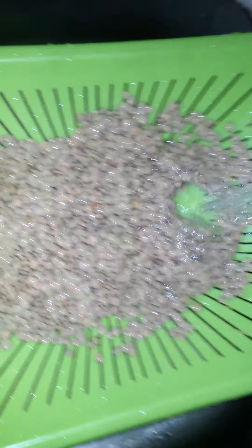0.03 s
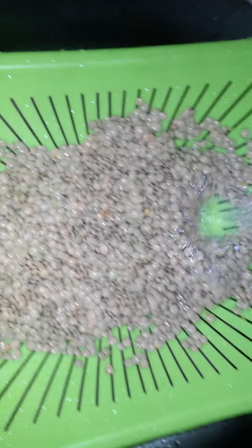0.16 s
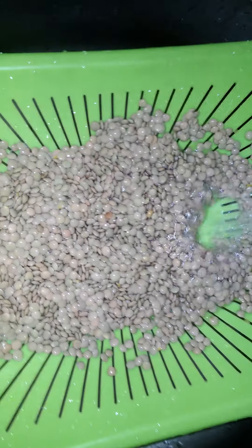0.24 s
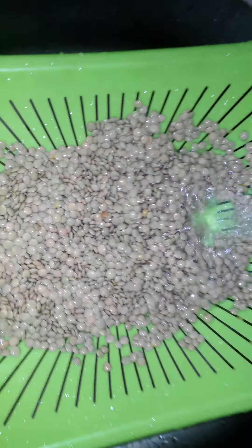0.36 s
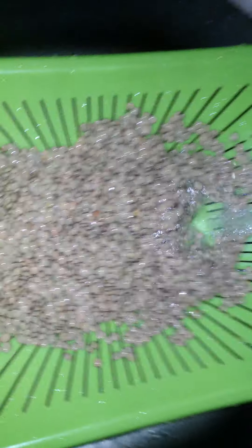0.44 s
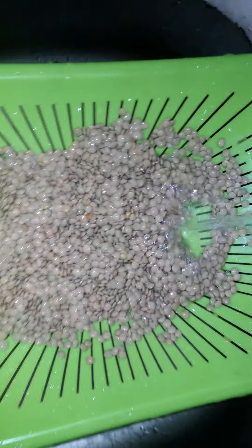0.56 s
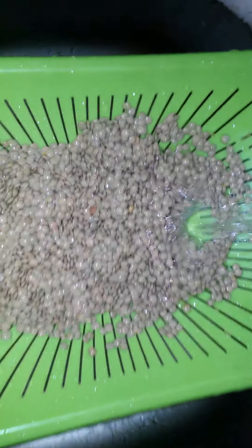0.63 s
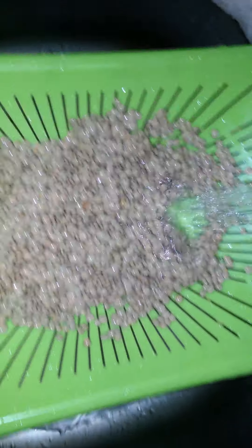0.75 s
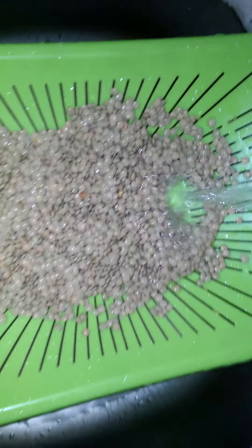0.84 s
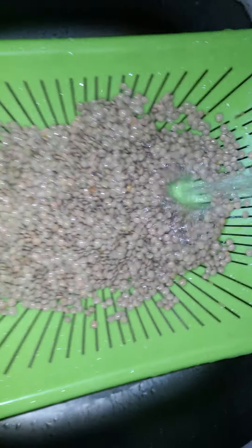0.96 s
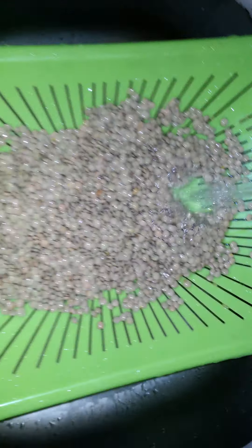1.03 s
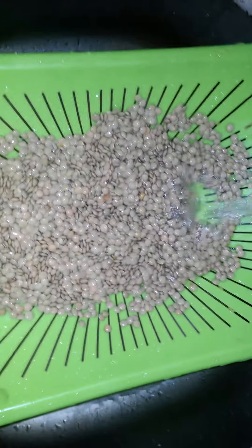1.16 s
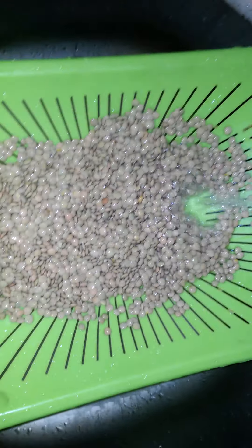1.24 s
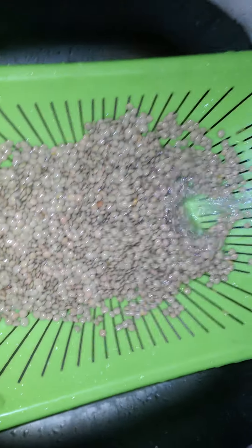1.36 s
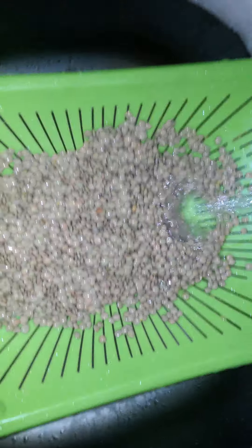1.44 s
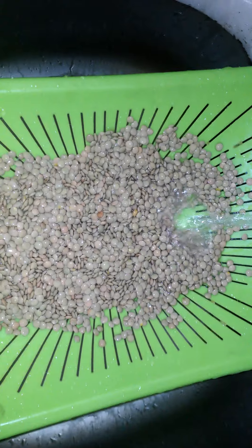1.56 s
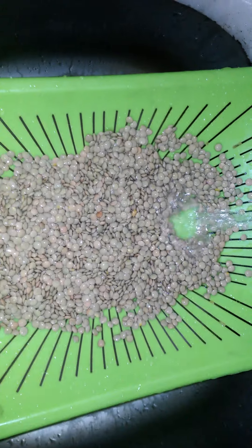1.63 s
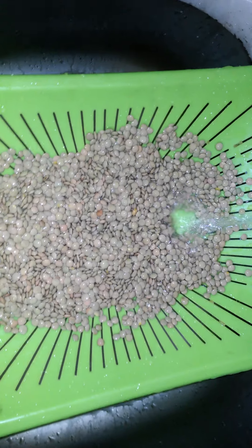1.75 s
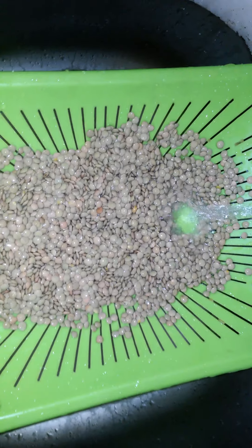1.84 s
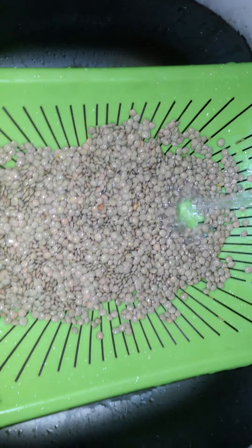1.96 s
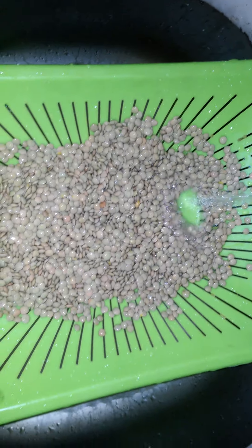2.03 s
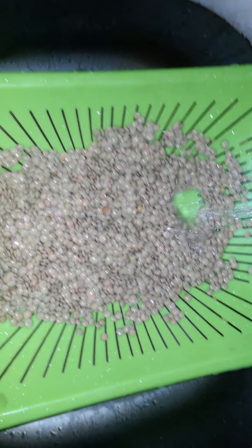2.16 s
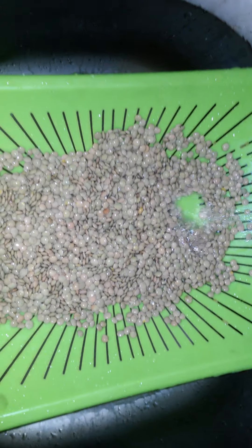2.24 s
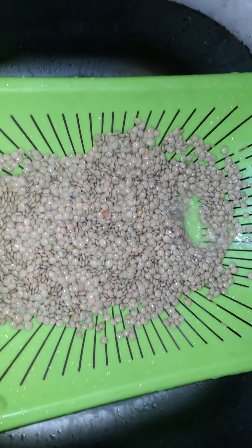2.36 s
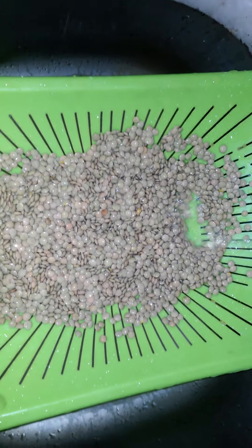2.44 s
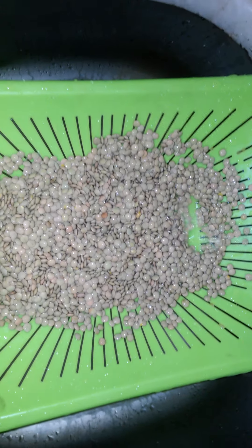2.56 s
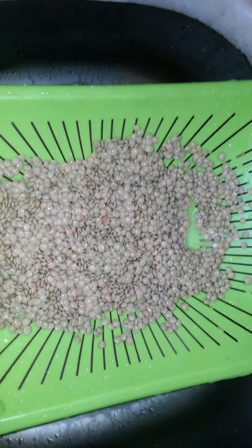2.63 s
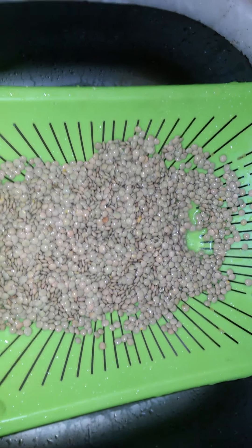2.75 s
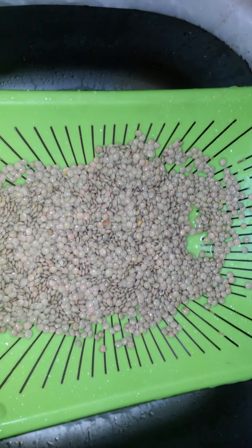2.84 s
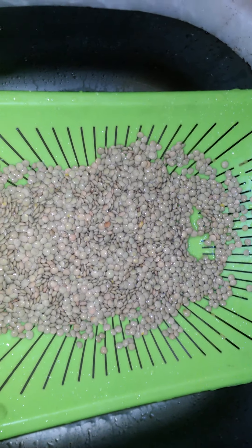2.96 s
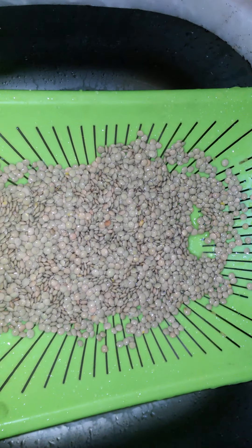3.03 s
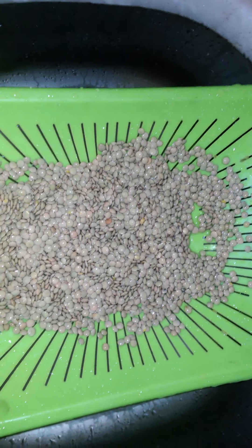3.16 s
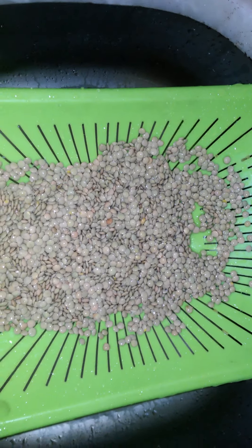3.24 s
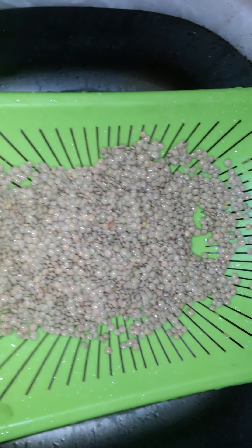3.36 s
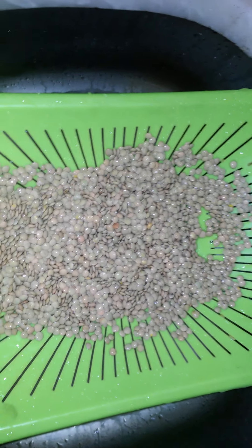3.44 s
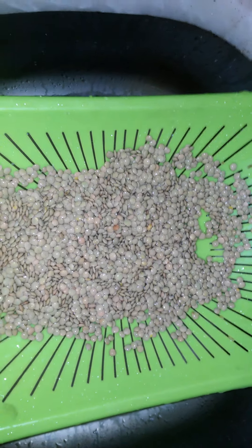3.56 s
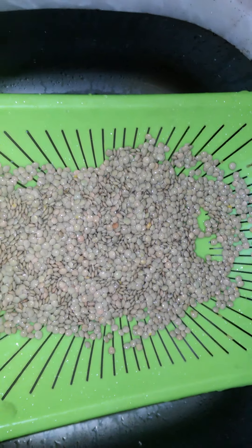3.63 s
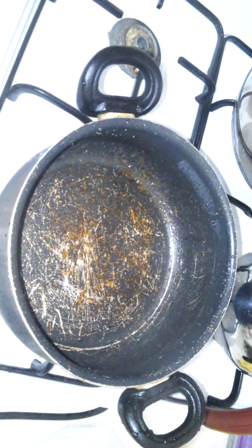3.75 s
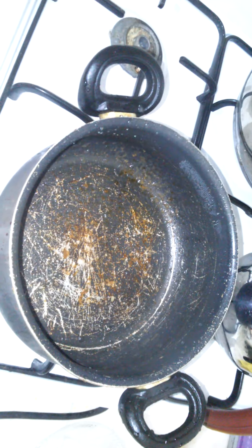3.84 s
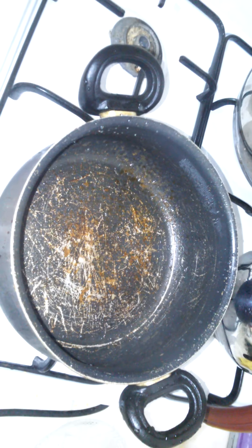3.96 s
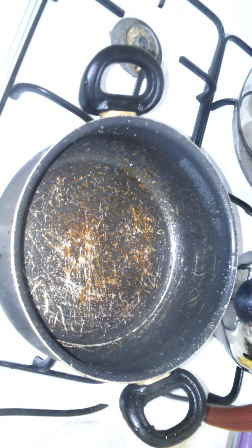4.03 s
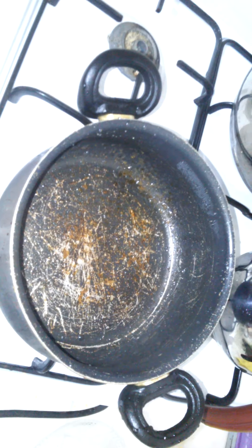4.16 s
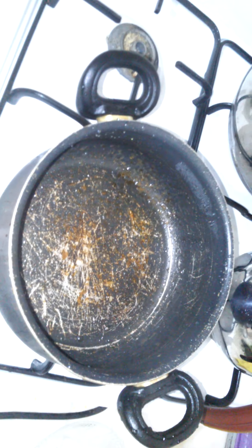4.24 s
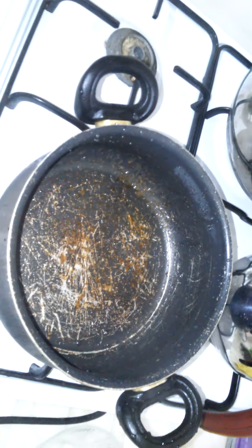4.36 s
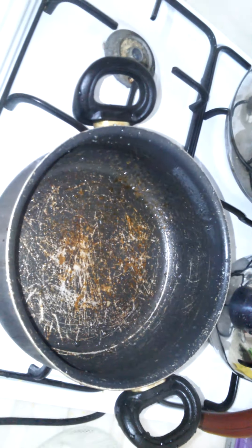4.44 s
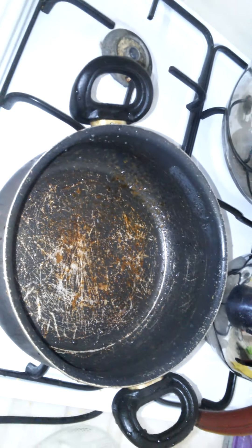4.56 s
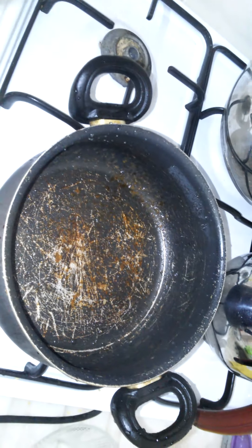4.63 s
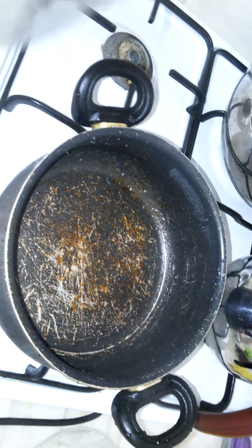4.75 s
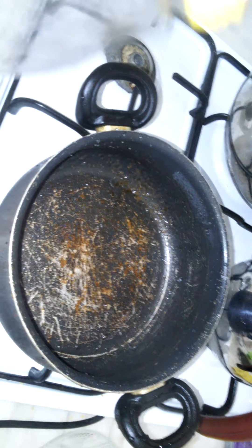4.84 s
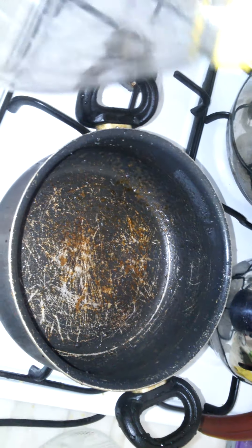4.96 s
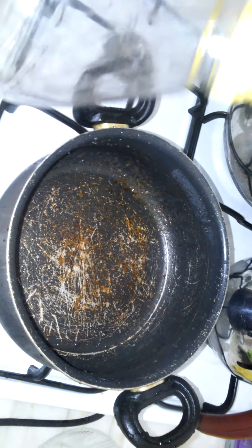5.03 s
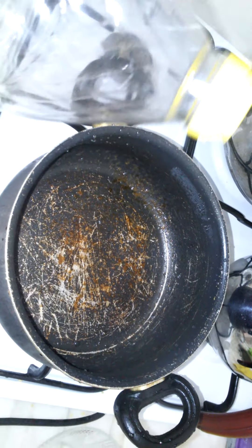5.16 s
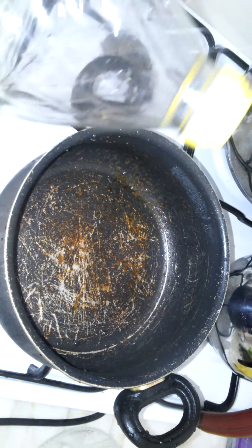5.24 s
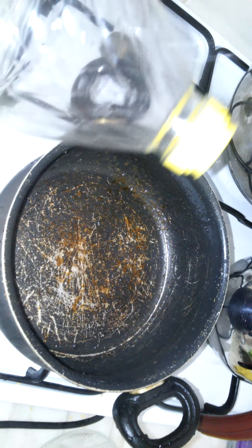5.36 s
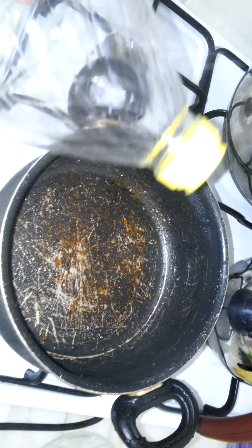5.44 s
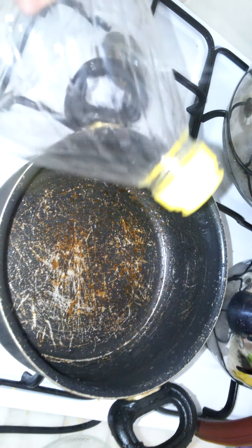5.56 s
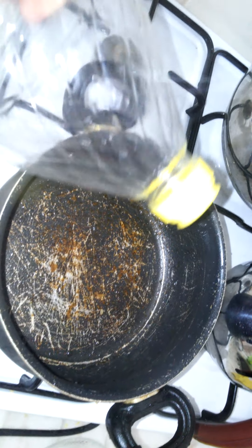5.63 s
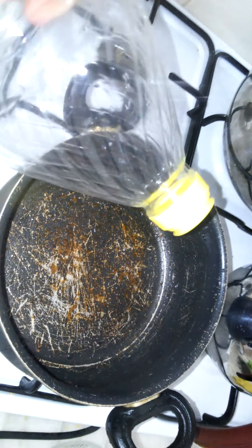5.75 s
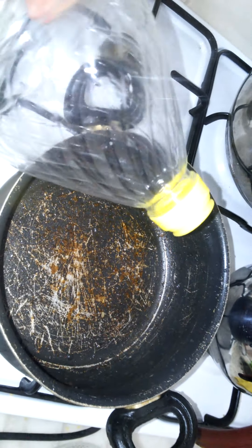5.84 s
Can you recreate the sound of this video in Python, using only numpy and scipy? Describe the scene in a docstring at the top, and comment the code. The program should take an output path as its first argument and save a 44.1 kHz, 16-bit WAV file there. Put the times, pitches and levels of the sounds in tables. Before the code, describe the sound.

Close up in a small hard kitchen, a tap sprays with bright crackle onto lentils in a plastic colander, with slapping drops, gurgling bubbles and soft drumming on the sink. The flow is turned down and stops, leaving plops and drips over a low hum. At a hard cut everything drops to almost silent room noise with a faint whirr and thin hiss.

```python
"""A crackling spray comes first: a tap runs onto lentils in a plastic colander, and each droplet is a tiny noise burst.
Drops slap with bright noise, air pockets plop and gurgle as ringing tones that rise, and run-off drums on the sink.
The flow dies away over a low hum, in a small hard kitchen made of short noise echoes.
Then the scene cuts to a quiet stove: only faint room noise, a whirr that comes and goes and a high hiss."""
import sys
import numpy as np
from scipy import signal
from scipy.fft import rfft, irfft, next_fast_len
from scipy.io import wavfile
from scipy.ndimage import map_coordinates

SR = 44100
rng = np.random.default_rng(int(sys.argv[2]) if len(sys.argv) > 2 else 0)


def inscribe(sig):
    """Save sig as 16-bit PCM at rate SR to the path in sys.argv[1].

    A 1-D sig is mono; a 2-D sig holds one channel per row.
    Samples are clipped to [-1, 1] before scaling.
    """
    pcm = np.round(np.clip(np.atleast_2d(sig).T, -1, 1) * 32767)
    wavfile.write(sys.argv[1], SR, pcm.astype(np.int16))


N = 260179
CUT_S = 3.642  # the sink is heard up to here

# Tone colour of the droplets bursting on the lentils: pitch_hz, gain_db
SPRAY_COLOUR = [(500, -19), (900, -11.5), (2500, 1), (5000, -3), (8000, 3), (11000, 1), (16000, 1)]


def spray(level_db, rate=600, scatter_db=9.0, life_s=.0025, mist_db=-15, crack_db=-8.0, crack_follow=0.88,
          fizz_db=-10, fizz_follow=1.5, clump_db=2.2):
    """Droplets burst as tiny cracks of very unequal size; a strong jet also beats up pinhead bubbles."""
    full_db = level_db.max()
    drop_db = level_db - full_db
    at, density = arrivals(level_db, rate, thinning=.5)
    sizes = amp(scatter_db * np.minimum(rng.standard_normal(N)[at], 2))
    # each burst adds energy that dies away; dividing by the density keeps the average even
    energy = np.bincount(at, sizes ** 2 / np.mean(sizes ** 2), N) * SR / density
    keep = np.exp(-2 / (life_s * SR))
    energy = signal.lfilter([1 - keep], [1, -keep], energy)
    loudness = np.sqrt(energy + amp(mist_db) ** 2)
    cracks = coloured(loudness * rng.standard_normal(N), SPRAY_COLOUR)
    cracks *= amp(full_db + crack_db + crack_follow * drop_db)  # the crackle outlasts the fizz
    fizz = swarm(full_db + fizz_db + fizz_follow * drop_db, rate=2000, thinning=0.29, centre_hz=7570,
                 spread=.3, deepening=0, cycles=13, rise=0.072, scatter_db=6.0, size=500)
    clumps = amp(clump_db * wobble(45))  # the jet breaks up in clumps
    return (cracks + fizz) * clumps


# Big drops that slap the wet plastic: start_s, level_db (before the gains below), pitch_hz (centre of the noise)
SPLATS = [(0.0715, -2.5, 8040), (0.2179, -5.5, 6540), (0.4712, -3, 8360), (1.1532, -4, 7160),
          (1.3971, -4.5, 8300), (1.4236, -2, 8700), (1.517, -12, 9150), (1.5617, -6.5, 7500),
          (1.662, -8.5, 8200), (1.7548, -5, 7200), (1.9539, -18, 7000), (2.0122, -3.5, 6400),
          (2.1093, -9.5, 8700), (2.2966, -12, 9450), (2.3464, -19, 7920), (2.4944, -19.5, 6200),
          (2.589, -14, 10200), (2.7181, -16.5, 6270), (3.0623, -8.5, 8040), (3.1142, -0.5, 6660),
          (3.1504, -12.5, 7300), (3.2934, -13, 11600), (3.5652, -14, 6760)]


def jet_gaps(gap_s=.028, gap_db=-4.5):
    """Gain of the spray: the jet necks in just before each big drop lands."""
    t = np.arange(N) / SR
    necks = sum(np.sin(np.pi * np.clip((s - t) / gap_s, 0, 1) ** .5) for s, _, _ in SPLATS)
    return amp(gap_db * necks)


def splats(life_s=0.006, width_hz=1900, gain_db=-13.5, crack_db=-20.0, crack_follow=0.36, crack_s=.004):
    """A drop slaps down: a bright crack, much alike for all drops, and brief fizzing noise around one pitch."""
    out = np.zeros(N)
    t = np.arange(SR // 16) / SR
    attack = np.minimum(t / .0008, 1) ** 2
    for s, db, hz in SPLATS:
        fizz = amp(db + gain_db) * band(hz, width_hz, size=len(t)) * np.exp(-t / life_s)
        crack = amp(crack_db + crack_follow * db) * band(9000, 12000, size=len(t)) * np.exp(-t / crack_s)
        add(out, s, (fizz + crack) * attack)
    return out


# Air pockets that ring out: start_s, level_db (before the gain below), pitch_hz
PLOPS = [(0.023, -11.5, 1716), (0.071, -4.5, 4370), (0.177, -9, 2840), (0.553, -10.5, 2000),
         (0.737, -9.5, 2470), (0.949, -6, 2087), (0.993, -9.5, 2017), (1.07, -10, 3060), (1.257, -10, 3350),
         (1.334, -7, 5730), (1.44, -9.5, 2880), (1.541, -9, 3580), (1.909, -14.5, 3020),
         (2.039, -11.5, 2085), (2.169, -12, 3100), (2.285, -22, 1587), (2.454, -16.5, 3110),
         (2.55, -20.5, 4270), (2.64, -11.5, 4790), (2.788, -23, 1112), (2.807, -22, 2130),
         (2.823, -20.5, 1123), (3.052, -23.5, 1503), (3.152, -27.5, 1194), (3.224, -26, 1665),
         (3.292, -25, 1120), (3.373, -16, 2960), (3.447, -19, 6200), (3.467, -14.5, 2920),
         (3.468, -22, 1387), (3.54, -20, 1677), (3.56, -19, 1784)]


def plops(rows, gain_db=7.5, splash_db=-24, splash_s=0.014, splash_width=0.65):
    """A larger air pocket rings as it tears loose, with a splash of noise near its own pitch."""
    out = np.zeros(N)
    t = np.arange(SR // 12) / SR
    for s, db, hz in rows:
        note = bubble(t, hz, cycles=7.44, rise=.18, onset=.65)
        splash = band(hz, splash_width * hz, size=len(t)) * np.exp(-t / splash_s)
        add(out, s, amp(db + gain_db) * (note + amp(splash_db) * splash))
    return out


def lesser_plops(level_db, count=22, above_db=9, scatter_db=1.5, low_hz=1500, high_hz=3500):
    """More air pockets in the same columns, at random moments, their strength following the gurgle."""
    moment, pitch = rng.random((count, 2)).T
    s = (np.arange(count) + moment) / count * CUT_S  # one in each equal slice of time
    db = level_db[(s * SR).astype(int)] + above_db + scatter_db * rng.standard_normal(count)
    hz = low_hz * (high_hz / low_hz) ** pitch
    return list(zip(s, db, hz))


# Tone colour of the bubbles between the lentils: pitch_hz, gain_db
GURGLE_COLOUR = [(300, -3), (580, -22), (820, -5), (1020, -10.5), (1130, 3), (1330, -19), (1550, -2.5),
                 (2050, -1.5), (2320, -5), (2600, 1), (4200, 0), (7000, -8)]


def gurgle(level_db, gain_db=-1):
    """Water folds air into the gaps between the lentils, as a crowd of small ringing bubbles."""
    bubbles = swarm(level_db + gain_db, rate=700, thinning=.8, centre_hz=2415, spread=.5, deepening=.028,
                    cycles=6.5, rise=0.17, scatter_db=4.0, size=1200)
    return coloured(bubbles, GURGLE_COLOUR)


# Tones the sink rings at when struck: pitch_hz, width_hz, level_db (against each other)
SINK_TONES = [(214.3, 6.2, 7.5), (258, 30, -9.5), (315.2, 16, -2.5), (333, 15, -20.5), (460, 17, -30)]
# Gushes of run-off that thump the sink: start_s, level_db (before the gain below), pitch_hz
THUMPS = [(0.238, -14, 312.7), (0.734, -23, 222), (0.986, -28, 234), (1.184, -18.5, 324.5),
          (1.236, -24, 238.5), (2.822, -25, 213)]


def drumming(level_db, rate=170, gain_db=2, thump_db=1):
    """Run-off patters on the sink floor and makes its tones ring; gushes add thumps."""
    at, density = arrivals(level_db, rate, thinning=.2)
    blows = np.bincount(at, rng.standard_normal(N)[at], N) / np.sqrt(density)
    ring = filtered(blows, lambda f: sum(amp(db) * resonance(f, hz, width) for hz, width, db in SINK_TONES))
    ring = signal.sosfilt(signal.butter(2, [190, 520], "bandpass", fs=SR, output="sos"), ring)
    out = ring / np.std(ring[:round(CUT_S * SR)]) * amp(level_db + gain_db)
    t = np.arange(SR // 4) / SR
    for s, db, hz in THUMPS:
        add(out, s, amp(db + thump_db) * bubble(t, hz, cycles=5.7, rise=0.029, onset=0.23))
    return out


# The tap runs full, is turned off steadily, and then the lentils drain
CLOSING_S, SHUT_S, DRAIN_DB_PER_S = 1.2, 2.5, 4
# How each water sound follows the tap: full_db, loss_db (in closing), power (no unit; higher holds on longer)
SPRAY_FLOW = (-18, 17, 3.1)
GURGLE_FLOW = (-24.5, 13.5, .9)
RUNOFF_FLOW = (-40.5, 7, 14)


def flow(full_db, loss_db, power):
    """Level of a water sound in dB: it holds, falls as the tap closes, then ebbs as the lentils drain."""
    t = np.arange(N) / SR
    closed = np.clip((t - CLOSING_S) / (SHUT_S - CLOSING_S), 0, 1)
    return full_db - loss_db * closed ** power - DRAIN_DB_PER_S * np.maximum(t - SHUT_S, 0)


def runoff(surge_s=2.34, surge_width_s=.12, surge_db=4.5):
    """Level of the run-off in dB; the thinning jet pours straight through onto the sink for a moment."""
    t = np.arange(N) / SR
    return flow(*RUNOFF_FLOW) + surge_db * np.exp(-((t - surge_s) / surge_width_s) ** 2)


# How long the kitchen's echo takes to fall by 60 dB: pitch_hz, decay_s
KITCHEN_DECAY = [(200, 0.45), (1500, 0.27), (4000, 0.29), (8000, 0.29), (16000, 0.24)]


def kitchen(x, wet_db, order=4096):
    """Sink walls and tiles answer with fading noise; the answer changes as the water lands in new places."""
    out = np.zeros(N)
    for start in range(0, round(CUT_S * SR), order):  # a fresh echo for each short block
        hz, t, z = signal.stft(rng.standard_normal(SR // 2), SR, nperseg=256)
        fading = amp(-60 * t / along(KITCHEN_DECAY, hz)[:, None])
        tail = signal.istft(z * fading, SR, nperseg=256)[1]
        tail *= 1 - np.exp(-np.arange(len(tail)) / SR / 0.00037)  # soft start
        add(out, start / SR, signal.fftconvolve(x[start:start + order], tail / np.linalg.norm(tail)))
    return x + amp(wet_db) * out


# Low tones in the room: pitch_hz, width_hz (doubled below), level_db
HUM_TONES = [(63, 5, -50.5), (97.4, 3, -50), (114, 21, -50), (137.5, 2.7, -50)]


def hum(rumble_db=-64):
    """A few narrow bands of noise, heard as wavering low tones, over a faint rumble."""
    tones = sum(amp(db) * band(hz, 2 * width) for hz, width, db in HUM_TONES)
    return tones + amp(rumble_db) * band(35, 60)


# Tone colour of the quiet room: pitch_hz, gain_db
QUIET_COLOUR = [(20, 12.5), (65, 13), (92, 3), (114, 16.5), (150, 0), (250, 0), (310, 7), (400, 3.5),
                (540, -0.5), (1000, -0.5), (5000, -5), (16000, -7.5)]
# Spells of a faint whirr at the stove: start_s, length_s, level_db
WHIRR = [(4.078, 1.14, -82.5), (5.536, 0.5, -81.5)]


def quiet(level_db=-77, fade_s=0.046, hiss_db=-90.0, drift_db=2.5):
    """Faint room noise, a whirr that comes and goes and a high hiss that drifts, all of filtered noise."""
    t = np.arange(N) / SR
    air = amp(level_db) * unit(coloured(rng.standard_normal(N), QUIET_COLOUR))
    spells = sum(amp(db) * np.clip(np.minimum(t - s, s + length - t) / fade_s, 0, 1) for s, length, db in WHIRR)
    whirr = spells * band(428, 41.2)
    hiss = amp(hiss_db + drift_db * wobble(7)) * band(9200, 3500)
    return air + whirr + hiss


def swarm(level_db, rate, thinning, centre_hz, spread, deepening, cycles, rise, scatter_db, size):
    """Many short-lived bubbles of random pitch; fewer as the flow falls, and deeper if deepening is above 0."""
    at, density = arrivals(level_db, rate, thinning)
    pitch, strength, life = np.clip(rng.standard_normal((len(at), 3)), -2, 2).T[:, :, None]
    hz = centre_hz * np.exp(spread * pitch + deepening * (level_db[at, None] - level_db.max()))
    rings = bubble(np.arange(size) / SR, hz, cycles * np.exp(.35 * life), rise, onset=0.16)
    rings *= amp(scatter_db * strength)
    rings /= np.sqrt(np.mean(np.sum(rings ** 2, axis=1)))
    samples = at[:, None] + np.arange(size)
    sound = np.bincount(samples.ravel(), rings.ravel(), N)
    return sound * np.sqrt(SR / density) * amp(level_db)


def bubble(t, hz, cycles, rise, onset):
    """A ringing air pocket: it swells for a share of its life, and its pitch climbs as it nears the surface."""
    age = t * hz / cycles
    climbing_hz = hz * np.exp(rise * (np.tanh(age) - np.tanh(1)))
    phase = 2 * np.pi * np.cumsum(climbing_hz, axis=-1) / SR
    return np.sin(phase) * np.exp(-age) * (1 - np.exp(-(age / onset) ** 2))


def arrivals(level_db, rate, thinning):
    """Random sample positions: rate a second at full flow, sparser as the level falls. Also the local rate."""
    density = rate * amp(thinning * (level_db - level_db.max()))
    count = np.cumsum(density) / SR
    marks = np.cumsum(rng.exponential(size=20000))
    return np.searchsorted(count, marks[marks < count[round(CUT_S * SR)]]), density


def band(hz, width, size=N):
    """Noise of rms 1 around one pitch."""
    m = next_fast_len(size)
    response = resonance(np.fft.rfftfreq(m, 1 / SR), hz, width) ** 2
    return unit(irfft(rfft(rng.standard_normal(m)) * response, m)[:size])


def wobble(rate):
    """A smooth curve through random points, rate points a second."""
    return map_coordinates(rng.standard_normal(int(N * rate / SR) + 4), [np.arange(N) * rate / SR])


def resonance(f, hz, width):
    """Response of one ringing tone to each frequency f, 1 at its centre."""
    return 1j * f * width / (hz * hz - f * f + 1j * f * width)


def filtered(x, response):
    """Apply a response that depends on frequency."""
    m = next_fast_len(len(x) + SR // 2)
    return irfft(rfft(x, m) * response(np.fft.rfftfreq(m, 1 / SR)), m)[:len(x)]


def coloured(x, points, size=8192):
    """Filter with the gain of the (pitch_hz, gain_db) points, so that it rings only after a blow."""
    # folding the cepstrum (spectrum of the log gain) moves all ringing after the blow
    cepstrum = irfft(np.log(amp(along(points, np.fft.rfftfreq(size, 1 / SR)))))
    cepstrum[1:size // 2] *= 2
    cepstrum[size // 2 + 1:] = 0
    return signal.fftconvolve(x, irfft(np.exp(rfft(cepstrum))))[:len(x)]


def along(points, hz):
    """Read values between (pitch_hz, value) points on a log pitch axis."""
    f, v = np.transpose(points)
    return np.interp(np.log(hz + 1), np.log(f + 1), v)


def amp(db):
    """Decibels to gain."""
    return 10 ** (np.asarray(db) / 20)


def unit(x):
    """Scale to rms 1."""
    return x / np.sqrt(np.mean(x ** 2) + 1e-20)


def add(track, s, sound):
    """Mix a sound into a track at time s in seconds."""
    part = track[max(round(s * SR), 0):][:len(sound)]
    part += sound[:len(part)]


def scene(fade_s=0.013):
    """The sink and hum up to the cut, the quiet room throughout."""
    gurgle_db = flow(*GURGLE_FLOW)
    stream = kitchen(spray(flow(*SPRAY_FLOW)) * jet_gaps() + gurgle(gurgle_db), wet_db=-3.5)
    pockets = kitchen(plops(PLOPS + lesser_plops(gurgle_db)), wet_db=-1.0)
    slaps = kitchen(splats(), wet_db=0.0)
    sink = kitchen(drumming(runoff()), wet_db=-6.5)
    before_cut = np.clip((CUT_S - np.arange(N) / SR) / fade_s, 0, 1)
    return ((stream + pockets + slaps + sink + hum()) * before_cut + quiet())[None]


def record(dry, port_hz=7700, port_width_hz=2300, port_db=5, top_hz=16020):
    """The microphone port resonates in the treble; peaks are rounded off; the band ends around top_hz."""
    sound = filtered(dry[0], lambda f: 1 + amp(port_db) * resonance(f, port_hz, port_width_hz))
    sound = sound / (1 + sound ** 6) ** (1 / 6)
    return filtered(sound, lambda f: np.clip((top_hz - f) / 200 + .5, 0, 1))[None]


dry = scene()
out = record(dry)
inscribe(out)
```